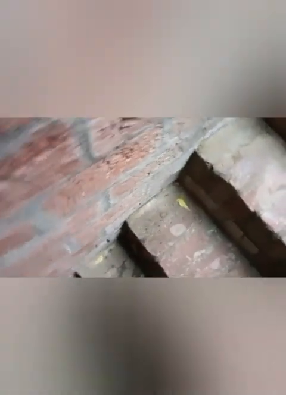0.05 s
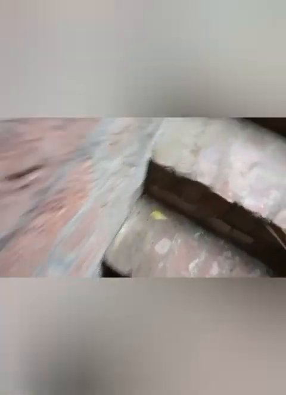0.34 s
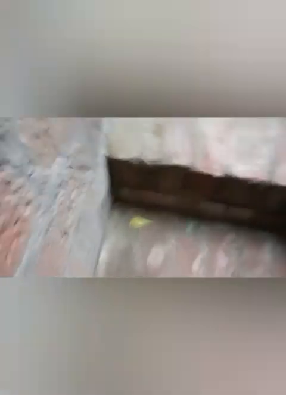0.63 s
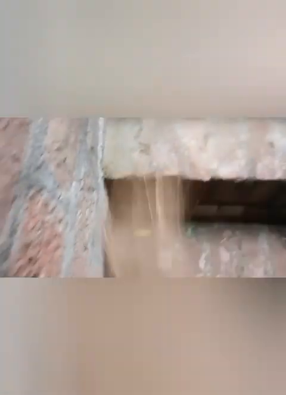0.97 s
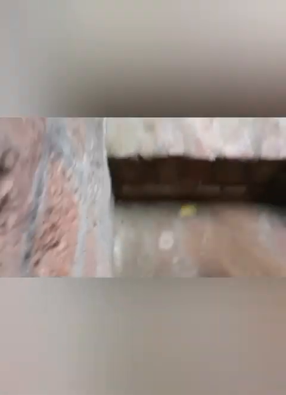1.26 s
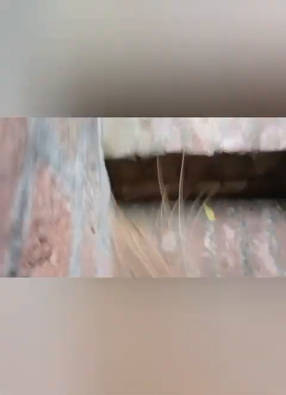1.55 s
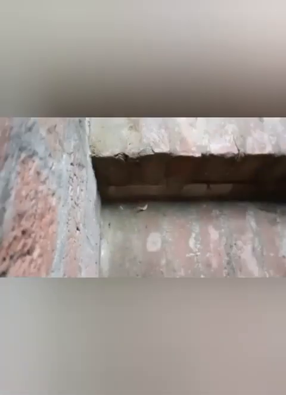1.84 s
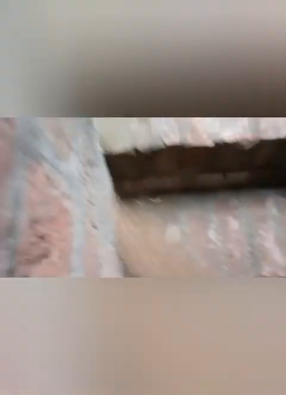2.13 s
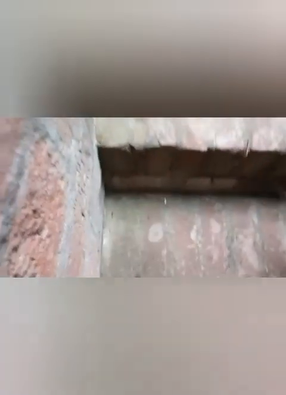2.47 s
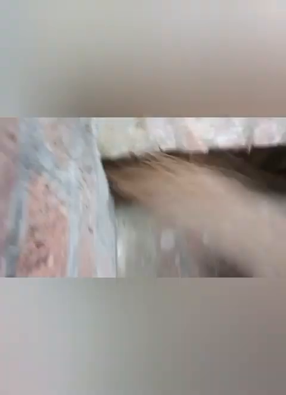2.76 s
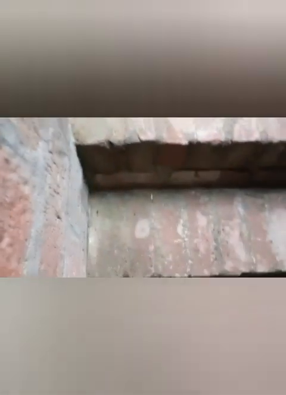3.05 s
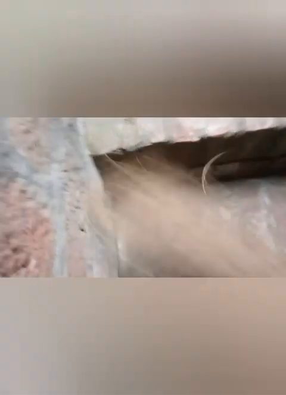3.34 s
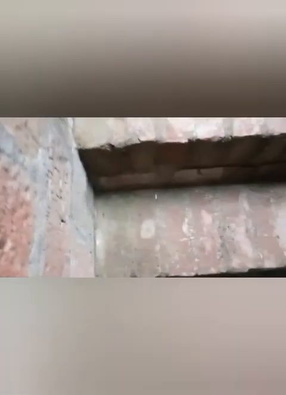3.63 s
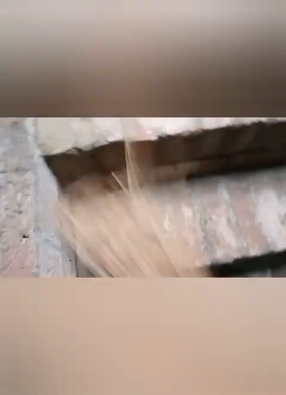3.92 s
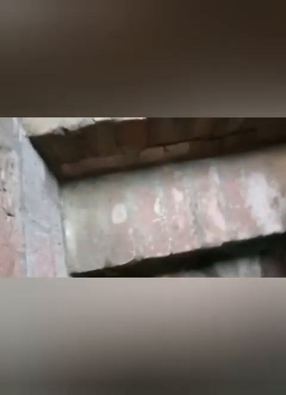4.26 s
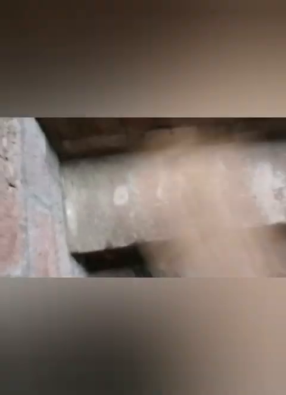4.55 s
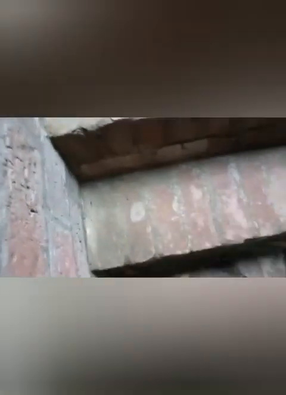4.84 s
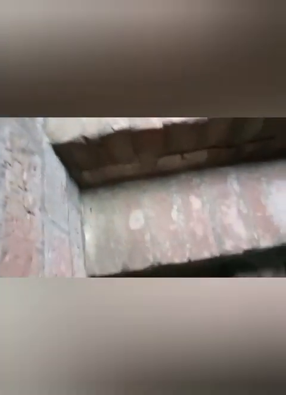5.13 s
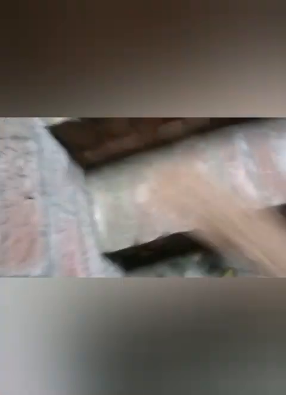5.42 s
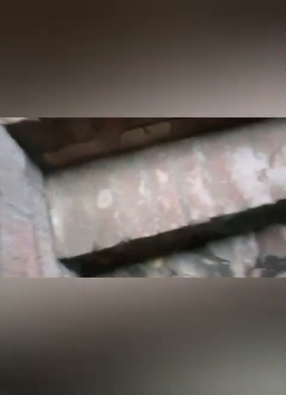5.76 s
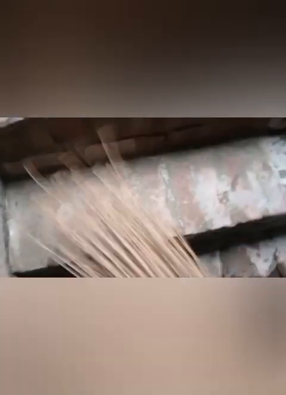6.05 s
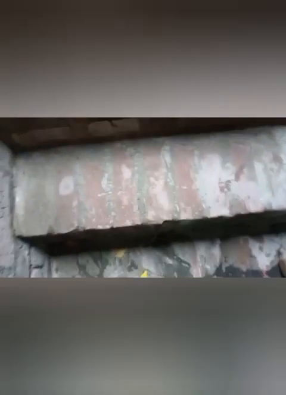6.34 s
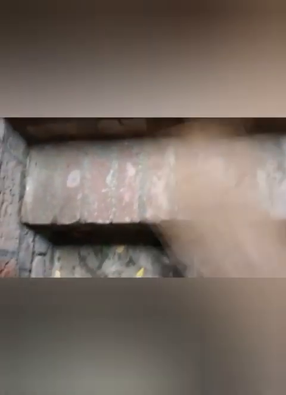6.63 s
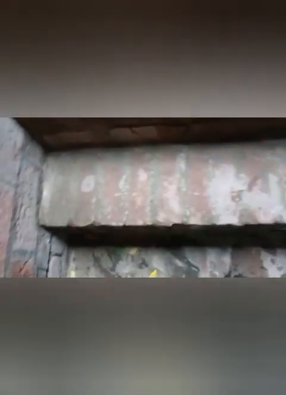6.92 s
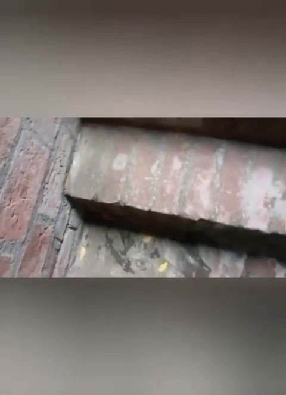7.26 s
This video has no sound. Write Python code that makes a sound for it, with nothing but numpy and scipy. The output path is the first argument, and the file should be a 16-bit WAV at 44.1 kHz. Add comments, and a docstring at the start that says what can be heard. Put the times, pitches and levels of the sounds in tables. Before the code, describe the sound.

A faint outdoor rumble comes up and a soft footfall thuds on a brick step. Then a stiff stick broom sweeps close to the microphone in quick, fairly even swishes, dry and scratchy with a bright hiss. On harder pushes the bundle rasps low and knocks dully on the brick. Single sticks tick between the strokes and just after the last one.

```python
"""A stiff stick broom sweeps brick steps outdoors, close to a mono microphone.
First the faint hum of the yard comes up and a footfall sets the step thudding. From about 1 s to 7 s
follow quick swishes, each a firm push with the tips trailing around it: hundreds of tips catch and slip
on the brick, and the riser reflects their sound. Pressed harder, the bundle rasps low and knocks on
the step. Single sticks tick between the strokes and after the last one."""
import sys
import numpy as np
from scipy import signal
from scipy.fft import rfft, irfft, next_fast_len
from scipy.io import wavfile

SR = 44100
rng = np.random.default_rng(int(sys.argv[2]) if len(sys.argv) > 2 else 0)


def output_pcm(signal):
    """Save a mono or channel-first signal as 16-bit PCM at the path in sys.argv[1].

    Samples are clipped to [-1, 1] before scaling.
    """
    pcm = np.clip(np.atleast_2d(signal).T, -1, 1) * 32767
    wavfile.write(sys.argv[1], SR, np.round(pcm).astype(np.int16))


N = 325899
TIME = np.arange(N) / SR


def undb(db):
    """Amplitude ratio of a level in decibels."""
    return 10 ** (np.asarray(db) / 20)


def unit(x):
    """Normalisation to rms 1."""
    return x / np.sqrt(np.mean(x ** 2))


def colour(x, spectrum):
    """Minimum-phase filter through (f/Hz, level/dB) points, scaled to keep the power of white noise."""
    size = next_fast_len(N + 8192, real=True)
    size += size % 2
    hz, db = np.transpose(spectrum)
    freqs = np.maximum(np.fft.rfftfreq(size, 1 / SR), 1)
    gain = unit(undb(np.interp(np.log(freqs), np.log(hz), db)))
    cepstrum = irfft(np.log(gain))
    cepstrum[1:size // 2] *= 2  # folding the cepstrum makes the filter causal
    cepstrum[size // 2 + 1:] = 0
    return irfft(rfft(x, size) * np.exp(rfft(cepstrum)))[:N]


def resonate(x, hz, q):
    """Second-order resonance with quality factor q."""
    return signal.lfilter(*signal.iirpeak(min(hz, .4 * SR), q, fs=SR), x)


def lowpass(x, hz, order=1):
    """Maximally flat attenuation of the treble above hz."""
    return signal.sosfilt(signal.butter(order, hz, fs=SR, output="sos"), x)


def walk(rate):
    """Random modulation of rms 1, interpolated between `rate` values a second."""
    knots = rng.standard_normal(N)
    return unit(np.interp(TIME * rate, np.arange(N), knots))


def decay(t, t60):
    """Exponential damping by 60 dB in t60 seconds."""
    return np.exp(-np.log(1000) * t / t60)


def burst(t60):
    """Half a second of exponentially damped white noise."""
    t = TIME[:SR // 2]
    return rng.standard_normal(len(t)) * decay(t, max(t60, .002))


def add(track, start_s, sound):
    """Superposition of a sound on a track."""
    start = int(start_s * SR)
    track[start:start + len(sound)] += sound[:N - start]


# Spectrum of the outdoor rumble: f/Hz, relative level/dB
YARD_SPECTRUM = [(25, -24), (45, -12), (75, 4.5), (130, -0.5), (260, -4.5), (450, -7.5), (700, -8),
                 (1200, -14), (2500, -20), (4200, -17), (6000, -28.5), (15000, -32)]
# The background comes up just before the work starts: t/s, level/dB
YARD_ENVELOPE = [(0, -73), (.455, -77), (.465, -57), (.9, -59), (7.39, -60.5)]
# Faint far-off tones: t/s, duration/s, f/Hz, level/dB
DISTANT_TONES = [(4.315, 0.26, 593, -61.5), (4.997, 0.18, 833, -59), (5.776, 0.26, 267, -63.5)]


def yard():
    """Ambient noise: a wavering rumble, a narrow-band whine and far tones blurred by random modulation."""
    level_db = np.interp(TIME, *np.transpose(YARD_ENVELOPE))
    rumble = colour(rng.standard_normal(N), YARD_SPECTRUM) * undb(2.4 * walk(11))
    whine = unit(resonate(resonate(rng.standard_normal(N), hz=6840, q=14), hz=6840, q=14))
    whine *= undb(-14 + 3 * walk(16))
    out = (rumble + whine) * undb(level_db)
    wobble, flutter = .04 * walk(150), undb(2.5 * walk(60))
    for start, length, hz, db in DISTANT_TONES:
        swell = np.sin(np.pi * np.clip((TIME - start) / length, 0, 1))
        phase = 2 * np.pi * np.cumsum(hz * (1 + wobble)) / SR
        out += undb(db) * swell * flutter * np.sin(phase)
    return out


def walls(x, t60, wet_db):
    """Reverberation: the brickwork around the steps scatters a short, dull tail."""
    tail = lowpass(burst(t60), hz=4500)
    tail *= np.minimum(TIME[:len(tail)] / 0.012, 1)
    return x + undb(wet_db) * signal.fftconvolve(x, tail / np.linalg.norm(tail))[:N]


# Modes of the hollow thud of the step: f/Hz, level/dB, T60/s
STEP_MODES = [(70, -45, 0.3), (117, -45.5, .3), (217, -36.5, 0.12), (298, -40, 0.33), (320, -31, 0.08),
              (358, -46, 0.5), (650, -54, 0.26)]


def footfall(scuff_s=.48, thud_s=.505):
    """Impact excitation: a soft shoe scuffs the grit, then sets the damped modes of the step ringing."""
    thud, grit, t = np.zeros(N), np.zeros(N), TIME[:SR // 2]
    modes = sum(undb(db) * np.sin(2 * np.pi * hz * t) * decay(t, t60) for hz, db, t60 in STEP_MODES)
    add(thud, thud_s, modes * np.minimum(t / 0.0027, 1))
    add(grit, scuff_s, undb(-53) * burst(t60=0.62))
    add(grit, scuff_s + .005, undb(-45) * burst(t60=0.028))  # the heel lands with a tick
    return thud + colour(grit, STICK_SPECTRUM)


# Single sticks that flick or touch down: t/s, relative level/dB, T60/s
STICK_TICKS = [(0.622, -47, 0.02), (0.800, -43.5, 0.025), (0.863, -48, 0.033), (0.932, -40, 0.036),
               (2.566, -45, .015), (2.589, -46, 0.013), (2.614, -35, 0.04), (3.165, -41, .03),
               (3.852, -20.5, 0.04), (3.905, -16, 0.0078), (4.416, -36, .025), (4.497, -27, 0.017),
               (4.532, -33, 0.033), (5.117, -24.5, 0.026), (5.221, -37, 0.038), (6.522, -25, 0.11),
               (6.635, -34, 0.061), (6.993, -12.5, 0.025), (7.289, -39, 0.016)]


def ticks():
    """Transient excitation: lone sticks snap against the brick and ring with the spectra of the swish."""
    snaps = np.zeros(N)
    for start, db, t60 in STICK_TICKS:
        add(snaps, start, undb(db) * burst(t60))
    return undb(-10.5) * colour(snaps, STICK_SPECTRUM) + undb(-10) * colour(snaps, TIP_SPECTRUM)


# Dull knocks of the bundle on the step: t/s, peak level/dB, resonance f/Hz, shudder T60/s
BUNDLE_KNOCKS = [(1.017, -36, 303, 0.074), (1.07, -39, 90, .06), (1.51, -32, 500, 0.063),
                 (1.744, -46, 130, 0.05), (2.381, -43, 600, 0.032), (2.619, -35, 704, 0.53),
                 (2.82, -25.5, 89, 0.12), (2.821, -21, 310, 0.044), (2.938, -26.5, 700, 0.0077),
                 (2.942, -30, 350, 0.017), (3.48, -26.5, 204, 0.12), (3.493, -27, 90, 0.024),
                 (3.838, -33, 600, .015), (3.851, -27, 895, 0.019), (4.213, -32.5, 158, 0.04),
                 (5.466, -29, 169, 0.1), (5.698, -40, 300, .08), (6.045, -32.5, 740, 0.03),
                 (6.056, -38.5, 520, 0.24), (6.867, -27, 160, 0.058)]


def knocks():
    """Forced response: a blow and the shudder after it drive one heavily damped resonance."""
    out = np.zeros(N)
    for start, db, hz, t60 in BUNDLE_KNOCKS:
        force = 0.089 * burst(t60)
        force[0] += 1  # the blow itself
        ring = resonate(force, hz, q=0.64)
        ring = lowpass(ring, 1.4 * hz, order=2)  # the springy bundle rounds off the blow
        add(out, start, undb(db) * ring / np.abs(ring).max())
    return out


def stray_sticks(effort_db):
    """Free vibration: loose sticks spring off the brick, each with a crack and two brief partials."""
    out, t = np.zeros(N), TIME[:SR // 25]
    for when, softness, pitch, length in rng.random((420, 4)):
        hz = 2200 + 3300 * pitch
        fade = decay(t, t60=.005 + 0.018 * length)
        ring = np.sin(2 * np.pi * hz * t) + 0.63 * np.sin(2 * np.pi * 2.2 * hz * t)
        crack = 1.8 * np.gradient(rng.standard_normal(len(t)))
        add(out, when * TIME[-1], undb(-15 * softness) * fade * (ring + crack))
    # they fade more slowly than the swish until the touch grows very light, then drop with it, so they stand
    # out as the broom lifts
    return out * undb(np.minimum(0.65 * effort_db - 24.5, effort_db - 12.5))


def riser_echo(x, effort_db, share, spread_ms):
    """Comb filtering: the direct sound interferes with its reflection from the riser."""
    # the path grows as the broom works away from the riser, and whenever it lifts
    lag_ms = 0.495 + 0.2007 * TIME - .1 * undb(effort_db)
    lag_ms += spread_ms * walk(25)  # the width of the broom blurs the treble of the echo
    return x + share * np.interp(TIME - lag_ms / 1000, TIME, lowpass(x, hz=7000))


def slips(rate, spread_db):
    """Shot noise of mean power 1: tips let go at random, `rate` times a second, with uneven strength."""
    chance = np.clip(rate / SR, 1e-4, 1)
    released = rng.random(N) < chance
    sizes = unit(undb(spread_db * np.clip(rng.standard_normal(N), -2, 2)))
    signs = rng.choice([-1, 1], N)
    return released * sizes * signs / np.sqrt(chance)


# Spectrum of the whole bundle: f/Hz, relative level/dB
BUNDLE_SPECTRUM = [(30, -30), (70, -3.5), (130, 1), (280, 4.5), (500, 3.5), (900, 3.5), (1600, 2.5),
                   (3000, -52), (8000, -48)]


def bundle_rasp():
    """Roughness excitation: joints and pits in the brick jolt the whole bundle."""
    jolts = slips(3000, spread_db=2.5) * undb(1.85 * walk(110))
    return colour(jolts, BUNDLE_SPECTRUM)


def shifting_contact(x, depth, q):
    """Spectral modulation: different groups of sticks touch in turn, so narrow bands swell and sink."""
    return x + depth * sum(walk(16) * resonate(x, hz, q) for hz in np.geomspace(1500, 7000, 12))


def contact(full_s, hold, rise, fall, steep=1):
    """Envelope of one touch: up 20 dB in `rise` seconds, held from full_s, down 20 dB in fall / steep."""
    attack = np.clip((full_s - TIME) / max(rise, .01), 0, 10) ** 1.39  # a quick bite that rounds off
    release = np.clip(steep * (TIME - full_s - hold) / max(fall, .01), 0, 10)
    return undb(-20 * (attack + release))


# Firm pushes; t marks full pressure, and the hiss and rasp envelopes are relative to that of the scrape:
# t/s, hold/s, rise/s, fall/s, scrape level/dB, hiss level/dB, rasp level/dB
FIRM_PUSHES = [(0.989, 0.03, 0.045, 0.058, -25.5, -0.5, -13), (1.202, 0.026, 0.15, 0.13, -29.5, -4.5, -43),
               (1.679, 0.044, 0.17, 0.11, -24, -4.5, -39), (2.09, 0.051, 0.064, .1, -25.5, -2.5, -22),
               (2.197, 0.11, 0.086, 0.14, -24.5, -0.5, -25.5), (2.809, 0.031, 0.12, .12, -21, 0.5, -14),
               (3.412, 0.071, 0.12, 0.16, -23.5, 2.5, -16), (4.119, 0.11, 0.12, 0.12, -26, 3, -15.5),
               (4.778, 0.089, 0.13, 0.17, -25, 2.5, -16), (5.448, 0.088, 0.098, 0.19, -25.5, 4, -12.5),
               (6.207, 0.056, 0.08, 0.083, -24.5, 1.5, -15), (6.876, .045, 0.061, 0.087, -24.5, 2.5, -13)]
# The tips trail lightly around the pushes; the envelope of the low ring is also relative to the scrape:
# t/s, hold/s, rise/s, fall/s, scrape level/dB, hiss level/dB, rasp level/dB, ring level/dB
LIGHT_DRAGS = [(0.95, 0.32, 0.022, 0.19, -35, -2, -19.5, -9),
               (1.484, 0.27, 0.13, .18, -31, 0, -16.5, -10.5),
               (2.042, .28, 0.033, 0.12, -33.5, -0.5, -12.5, -9),
               (2.645, 0.29, 0.031, 0.22, -34, 1, -13.5, -14), (3.18, .08, .03, .1, -44.5, 2, -14, -22),
               (3.273, 0.34, 0.047, 0.13, -33.5, 3, -12.5, -14.5),
               (3.846, 0.072, 0.2, .2, -38, -0.5, -23, -16), (3.977, 0.26, 0.078, .19, -33, -0.5, -19, -13),
               (4.61, 0.33, 0.06, 0.16, -40.5, -8, -16, -8.5), (5.268, .15, 0.11, .2, -47, -3, -18, -14),
               (5.574, 0.14, 0.05, 0.15, -35, 3.5, -26, -17),
               (6.168, 0.26, 0.042, 0.12, -33.5, 3, -22, -15),
               (6.525, .05, 0.034, 0.19, -46, -5, -13.5, -23),
               (6.829, 0.25, 0.048, 0.2, -36.5, 1.5, -26, -18.5)]


def strokes(hiss_lag_s=0.009, bundle_lead_s=0.006):
    """Incoherent addition: pushes and drags sum in power to envelopes of scrape, hiss, rasp and ring."""
    rustle = undb(-60) * contact(0.874, hold=TIME[-1], rise=0.057, fall=.1)  # the broom is never still
    scrape, hiss, rasp, ring = rustle ** 2, (undb(-11) * rustle) ** 2, 0, 0
    pushes = [(*push, -32) for push in FIRM_PUSHES]  # ring level/dB: pressed sticks hardly ring low
    for full_s, hold, rise, fall, db, hiss_db, rasp_db, ring_db in pushes + LIGHT_DRAGS:
        tip_hold = hold + hiss_lag_s  # the tips whip on just after the stroke ends
        bundle_hold = hold - bundle_lead_s  # the stiff bundle leaves the step first
        scrape += (undb(db) * contact(full_s, hold, rise, fall)) ** 2
        hiss += (undb(db + hiss_db) * contact(full_s, tip_hold, rise, fall, steep=1.34)) ** 2
        rasp += (undb(db + rasp_db) * contact(full_s, bundle_hold, rise, fall, steep=1.92)) ** 2
        ring += (undb(db + ring_db) * contact(full_s, bundle_hold, rise, fall, steep=0.75)) ** 2
    return np.sqrt([scrape, hiss, rasp, ring])


# Spectrum of the scraping sticks: f/Hz, relative level/dB
STICK_SPECTRUM = [(300, -38), (800, -34.5), (1300, -24), (1750, -7), (2200, -4.5), (3000, -1.5),
                  (3900, 1.5), (4500, -0.26), (5300, -4.5), (7000, -10.5), (9000, -7), (15000, -67)]
# Spectrum of their hissing tips: f/Hz, relative level/dB
TIP_SPECTRUM = [(3000, -21), (6000, -6), (7700, -8.5), (9200, -2), (10500, -5), (12200, -5.5), (13700, -2),
                (15400, 0.5)]


def sweep():
    """Stick-slip friction of the tips: sparse crackle on a light touch, a dense swish in mid-stroke."""
    scrape, hiss, rasp, ring = strokes()
    effort_db = 20 * np.log10(scrape) + 22  # about 0 in a full stroke
    slips_per_s = 24000 * undb(.8 * effort_db)
    # sticks catch and let go in clumps: the fewer of them touch, the more the sound flutters
    flutter_db = np.clip(.6 - 0.036 * effort_db, .3, 4)
    clumps = undb(flutter_db * (walk(120) + .5 * walk(30)))
    catches = slips(slips_per_s, spread_db=-1.0) * clumps
    sticks = shifting_contact(colour(catches, STICK_SPECTRUM), depth=0.33, q=14.5) * undb(-1.04) * scrape
    woodiness = 0.24 - 0.045 * TIME  # the scrape starts woody and thins as the work goes on
    sticks += woodiness * resonate(sticks, hz=2670, q=3.3)
    tip_catches = slips(1.1 * slips_per_s, spread_db=2.0) * clumps
    tips = colour(tip_catches, TIP_SPECTRUM) * undb(4) * hiss
    flexes = slips(slips_per_s, spread_db=5.5)  # bending sticks give the low ring
    bending = unit(resonate(resonate(flexes, hz=1470, q=1.06), hz=1470, q=1.06)) * undb(-3) * ring
    bundle = bundle_rasp() * rasp
    swish = riser_echo(sticks + tips + bending, effort_db, share=0.14, spread_ms=0.062)
    return swish + bundle + stray_sticks(effort_db)


def scene():
    """Superposition at one microphone, alike in both channels."""
    mono = walls(sweep() + knocks() + ticks() + footfall(), t60=0.17, wet_db=-17.5) + yard()
    return np.array([mono, mono])


def record(dry):
    """Band limiting: the small microphone loses the deep bass; the recorder cuts the top steeply."""
    bass_cut = signal.butter(3, 52, "highpass", fs=SR, output="sos")
    treble_cut = signal.ellip(12, .1, 80, 15600, fs=SR, output="sos")
    return signal.sosfilt(treble_cut, signal.sosfilt(bass_cut, dry))


dry = scene()
out = record(dry)
output_pcm(out)
```